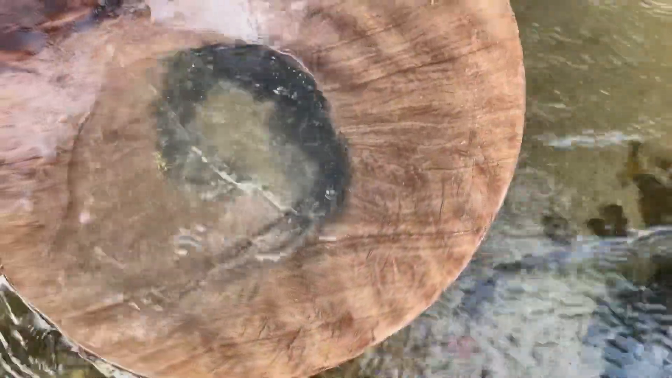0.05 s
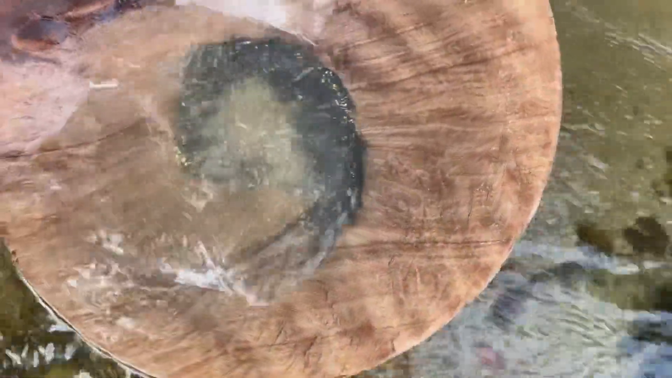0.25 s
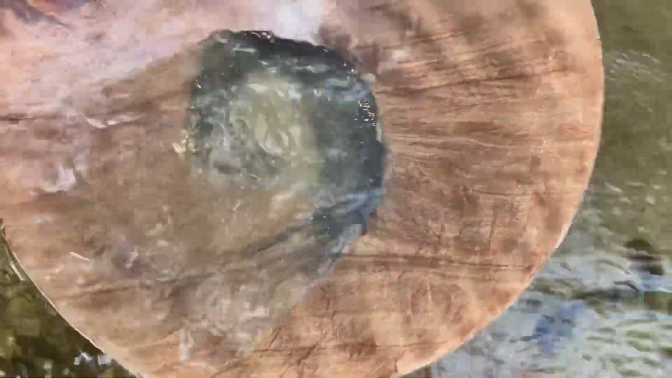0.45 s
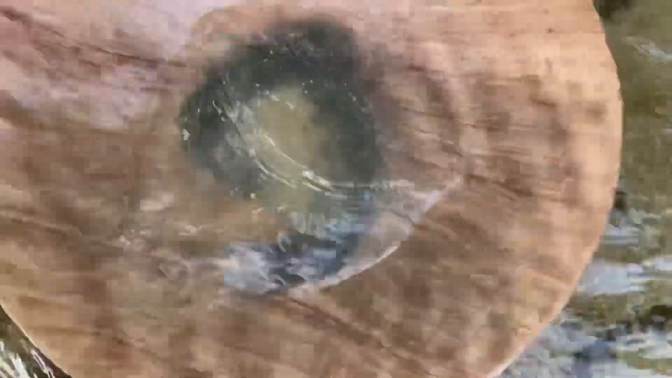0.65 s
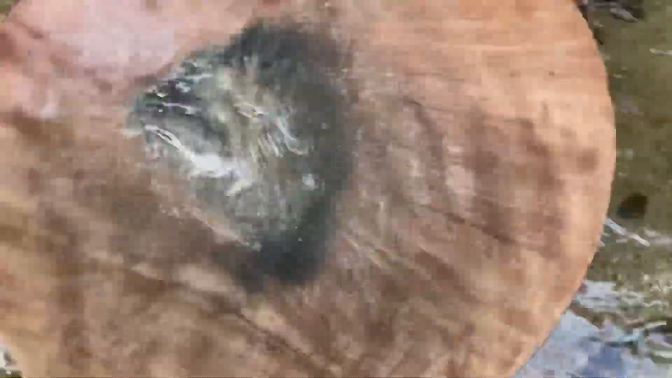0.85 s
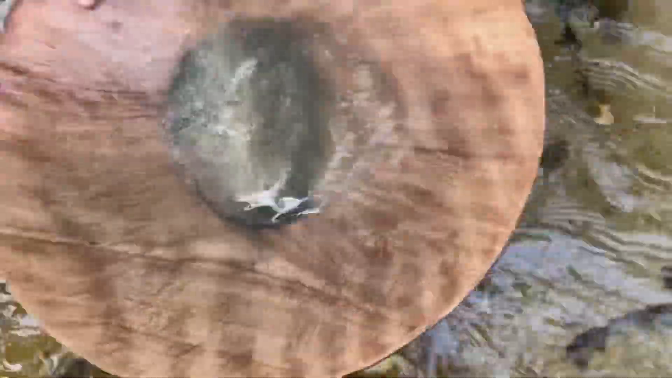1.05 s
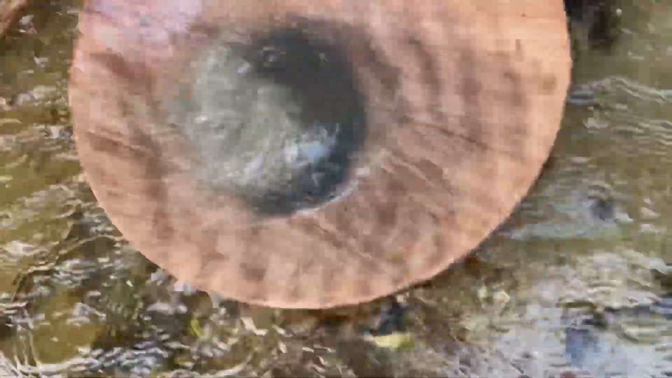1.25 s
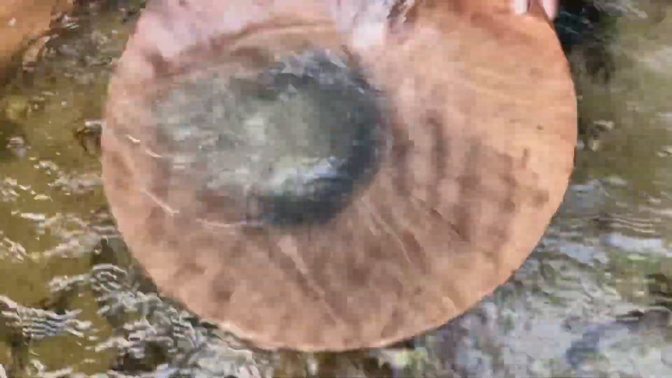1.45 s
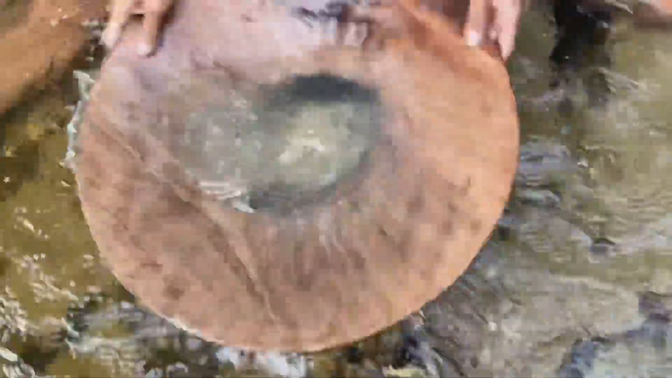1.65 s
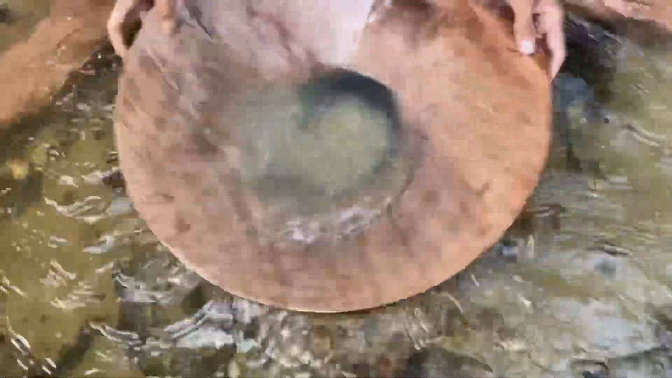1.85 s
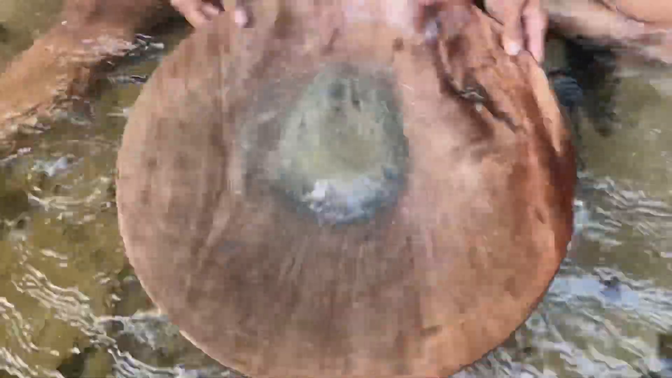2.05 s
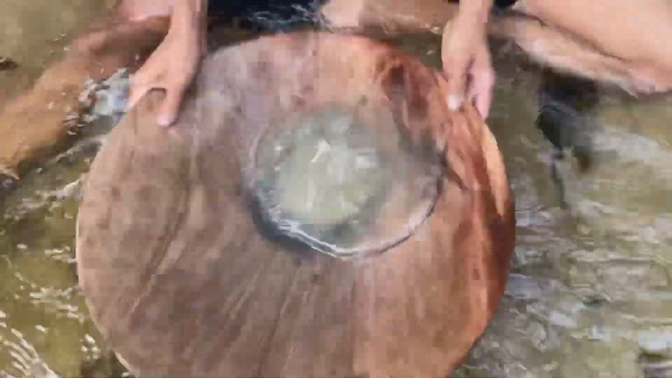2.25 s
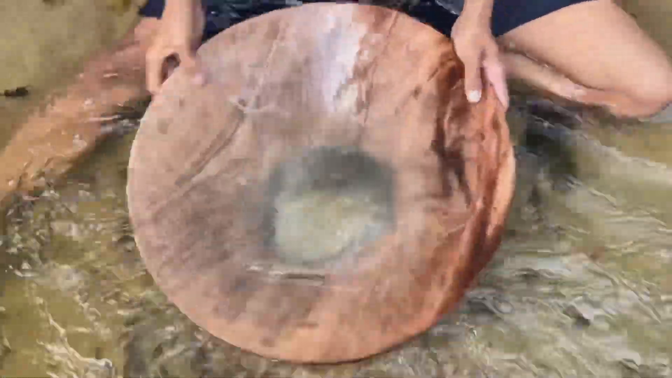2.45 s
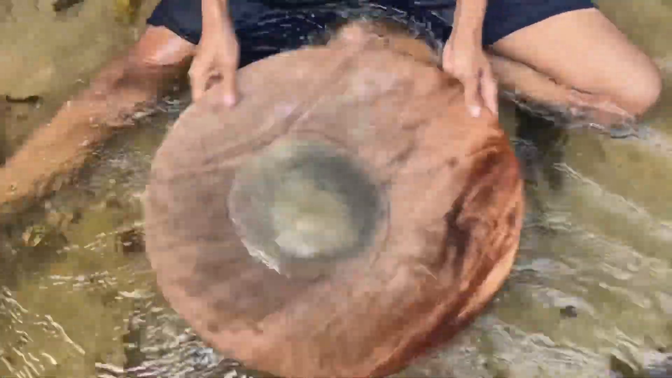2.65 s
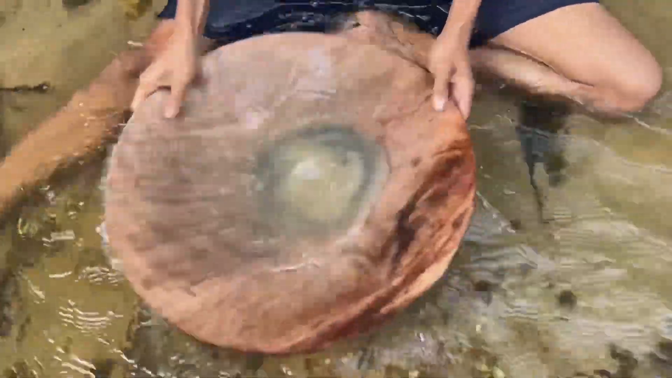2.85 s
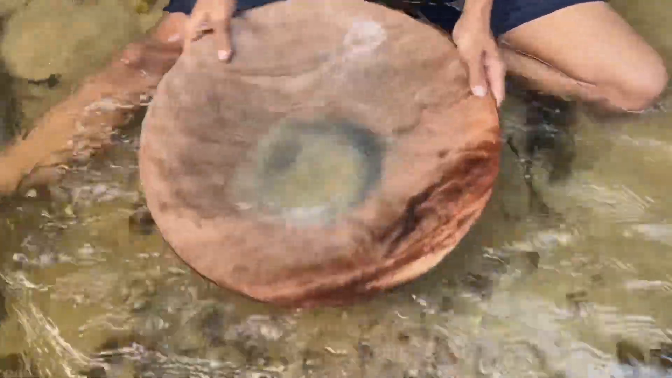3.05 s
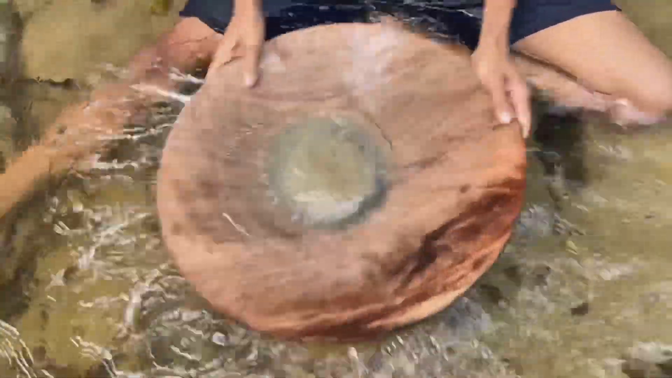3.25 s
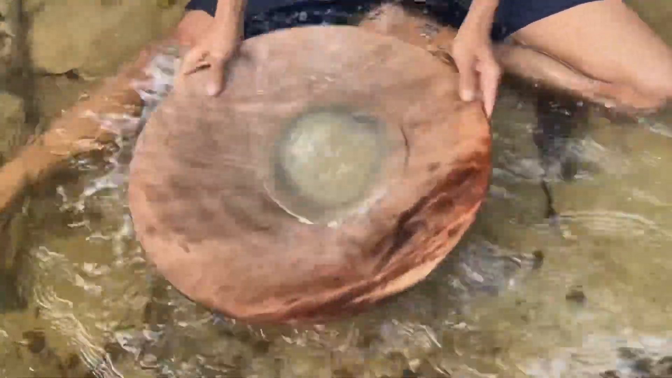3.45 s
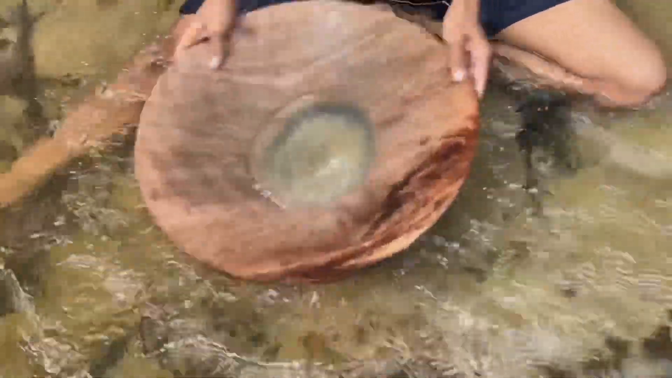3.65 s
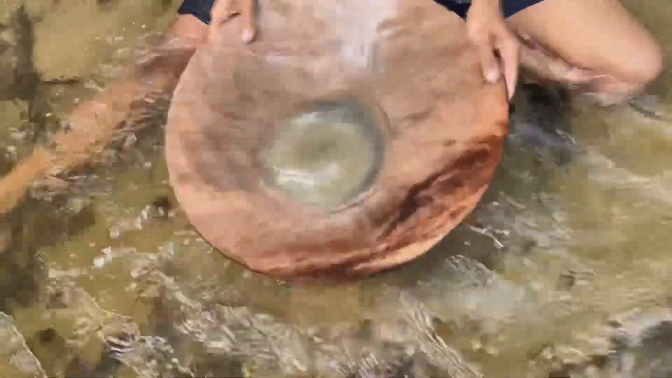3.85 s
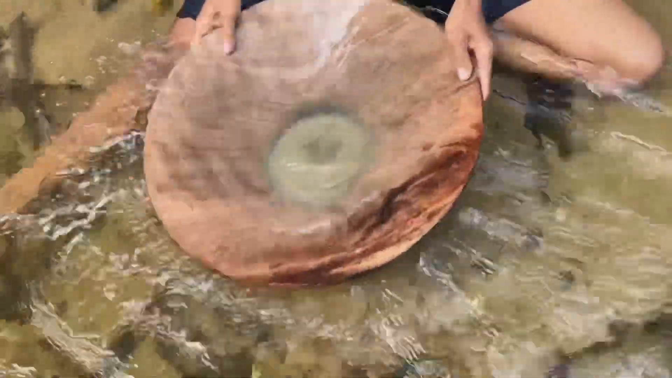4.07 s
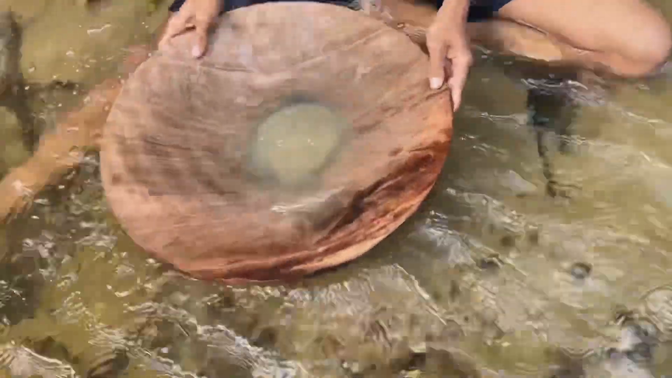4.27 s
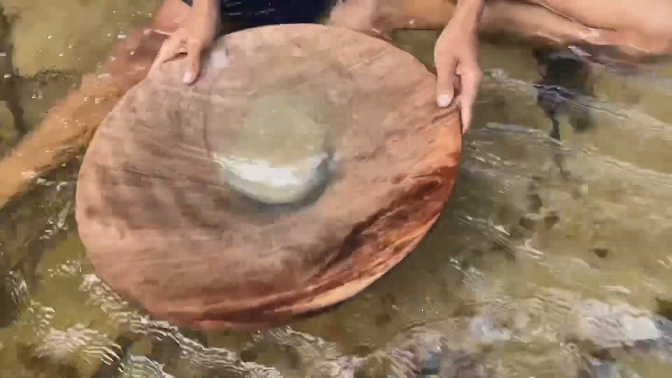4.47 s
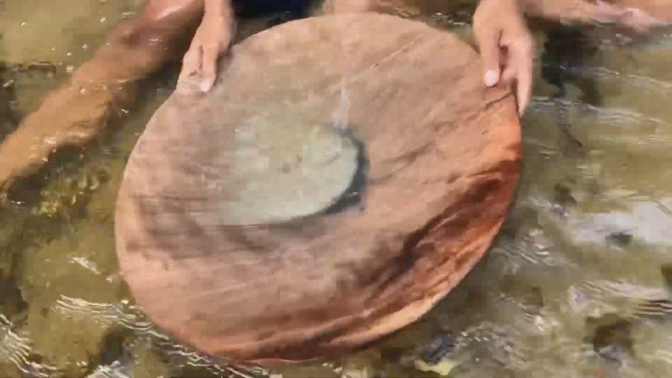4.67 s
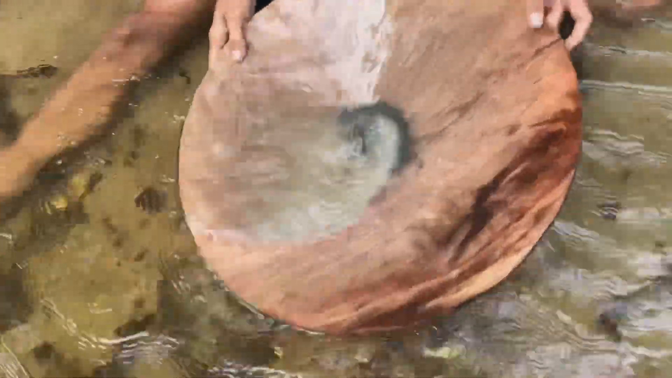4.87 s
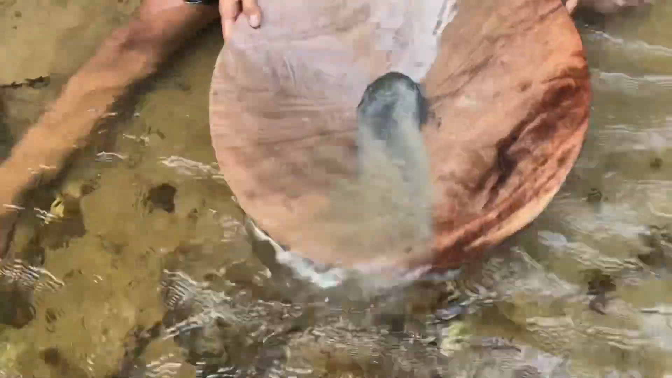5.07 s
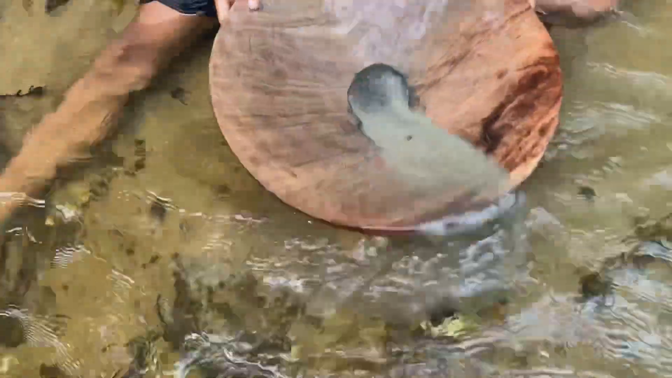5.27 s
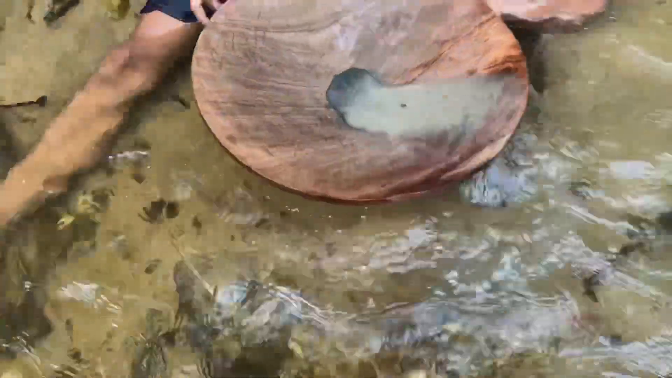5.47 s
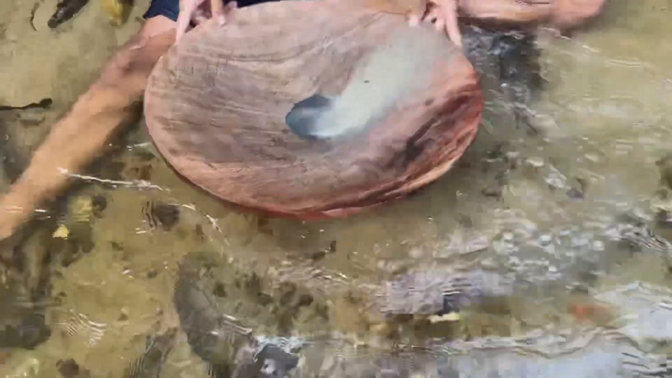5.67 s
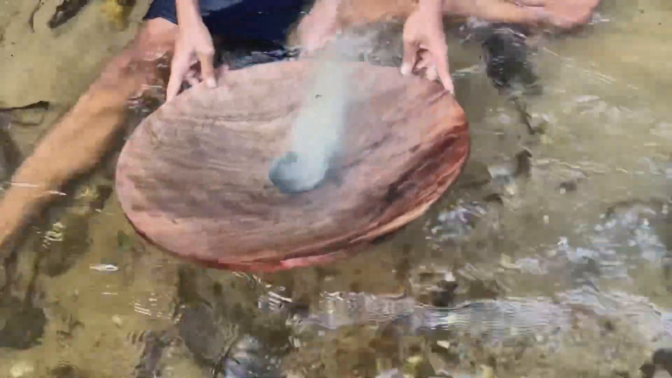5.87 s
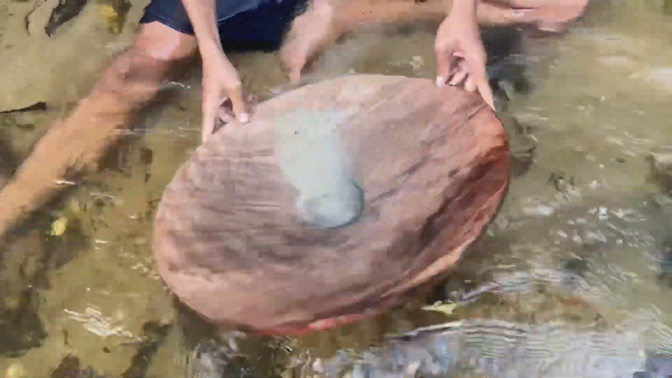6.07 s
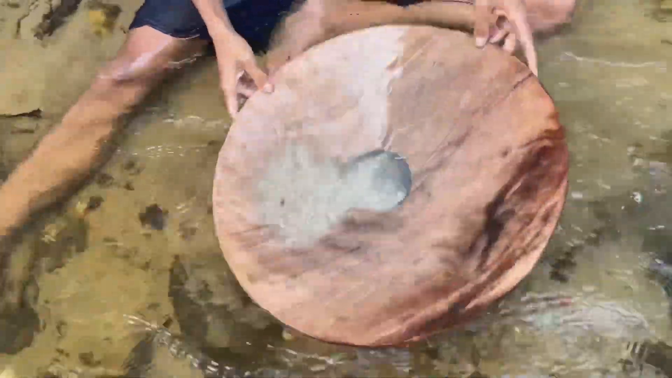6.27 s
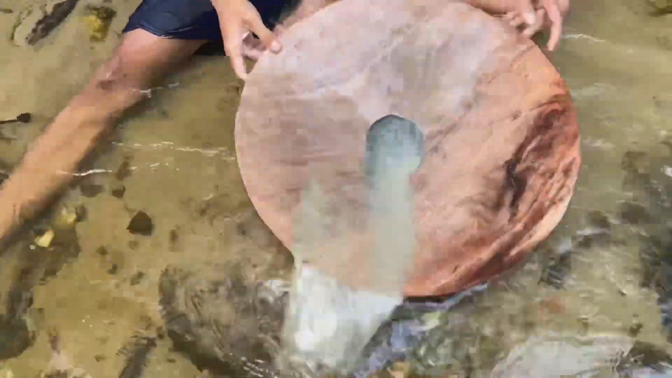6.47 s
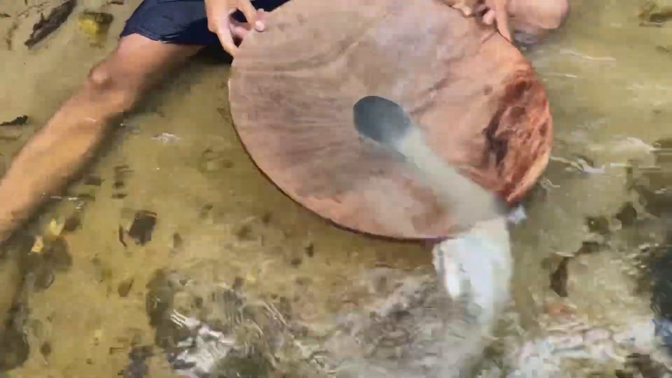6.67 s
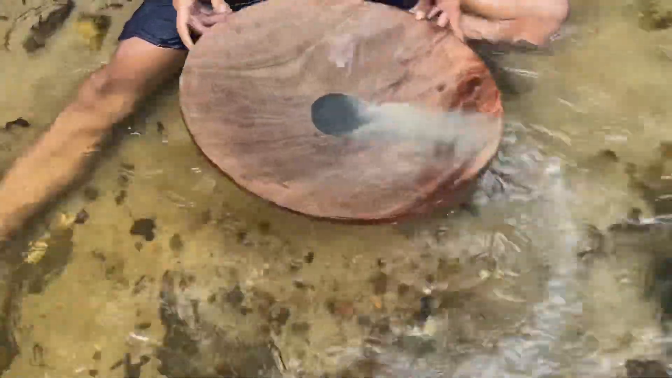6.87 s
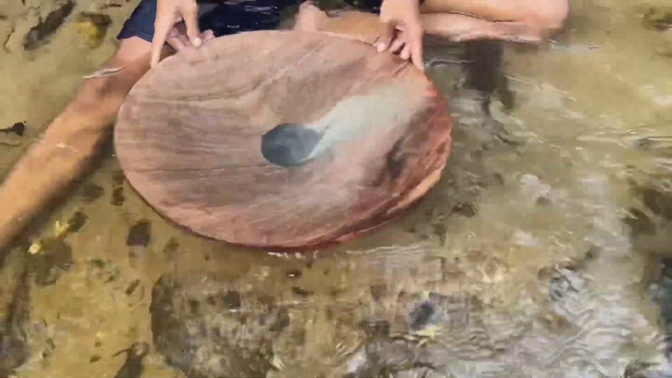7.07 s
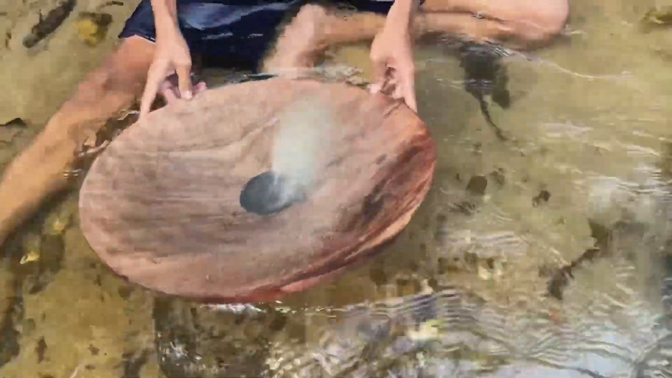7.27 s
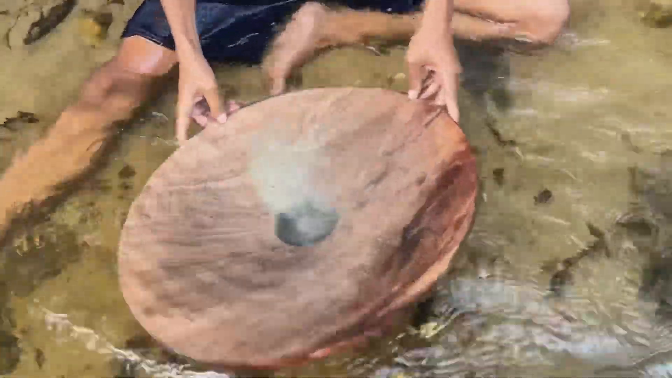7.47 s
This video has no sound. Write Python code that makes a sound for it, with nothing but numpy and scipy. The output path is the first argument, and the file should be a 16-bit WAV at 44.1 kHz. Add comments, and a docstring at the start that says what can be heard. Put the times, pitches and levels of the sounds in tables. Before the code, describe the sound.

A close, natural stereo scene at a shallow forest stream. From 0 to about 4.3 s water is swirled in a wooden pan: irregular bubbly sloshes begin with a sharp slap near 0.55 s and recur every few tenths of a second, with short hollow plops, fizzing spray and dry ticks of gravel on wood. Around 3 to 4 s the swirl is fuller and more gurgling. Birds sing rapidly over it, with arching whistles, downward slurs and raspy buzzes, fainter sweeps behind; a bright note sounds near 3.6 s and a strong trilled one near 4.9 s. From 4.8 s the pan is tipped and the water turns softer, with gulps, drips and a light patter near 5.7 s. Two distant notes slide down around 6 to 6.4 s. A distinct low plop and small pour come at 6.6 s, then quiet drips. A high, shimmering insect drone, stronger left, and faint brook persist to 7.5 s.

```python
"""In a shallow forest stream a wooden gold pan is swirled, then tipped so that water pours off its rim.
Sloshes swell clouds of brief ringing bubbles; air pockets and a few high drops plop as gliding, dying tones,
and gravel ticks on the wood as short noise bursts. Birds whistle and buzz on bent, trilled sine tones,
near and far, over a drone of insects and a trickling brook made of coloured noise and tiny bubbles."""
import sys
import numpy as np
from scipy import signal
from scipy.fft import rfft, irfft
from scipy.io import wavfile
from scipy.ndimage import uniform_filter1d

SR = 44100
rng = np.random.default_rng(int(sys.argv[2]) if len(sys.argv) > 2 else 0)


def unload_audio(sound):
    """Save the sound as a 16-bit wav file, at the path given as the first command line argument."""
    columns = np.transpose(np.atleast_2d(sound))
    # keep every value between -1 and 1, then stretch to whole-number steps
    steps = np.round(np.clip(columns, -1, 1) * 32767)
    wavfile.write(sys.argv[1], SR, steps.astype(np.int16))


N = 331632
TIME = np.arange(N) / SR


def undb(db):
    """Decibels to gain."""
    return 10 ** (np.asarray(db) / 20)


def unit(x):
    """Scale to rms 1."""
    return x / np.sqrt(np.mean(x ** 2))


def curves(table):
    """The columns of a table, joined by straight lines in time."""
    s, *columns = np.transpose(table)
    return [np.interp(TIME, s, column) for column in columns]


def colour(x, points):
    """Minimum-phase filter through (Hz, dB) points, made from the cepstrum of its gain."""
    hz, db = np.transpose(points)
    size = 2048
    f = np.maximum(np.fft.rfftfreq(size, 1 / SR), 1)
    octaves_below = np.maximum(np.log2(hz[0] / f), 0)
    octaves_above = np.maximum(np.log2(f / hz[-1]), 0)
    gain_db = np.interp(np.log(f), np.log(hz), db)
    gain_db = gain_db - 20 * octaves_below - 40 * octaves_above
    cepstrum = irfft(np.log(undb(gain_db)))
    # folding the cepstrum forward makes the filter causal
    cepstrum[1:size // 2] *= 2
    cepstrum[size // 2 + 1:] = 0
    response = irfft(np.exp(rfft(cepstrum)))
    return signal.fftconvolve(x, response[None], axes=1)[:, :N]


def walk(rate):
    """Random levels held 1 / rate s and smoothed twice; spread near 1."""
    k = int(SR / rate)
    steps = np.repeat(rng.standard_normal(N // k + 1), k)
    return 1.54 * uniform_filter1d(uniform_filter1d(steps, k), k)[:N]


def noise(side):
    """Stereo white noise with a given weight of left-right difference."""
    common, apart = rng.standard_normal((2, N))
    return np.array([common + side * apart, common - side * apart])


def pan(db):
    """Left and right gains for a left minus right level in dB."""
    return undb(np.array([[.5], [-.5]]) * db)


def add(out, s, sound):
    """Mix a sound in at a time in seconds."""
    i = int(np.clip(s * SR, 0, N - 1))
    out[:, i:i + sound.shape[-1]] += sound[..., :N - i]


def lagged(x, ms):
    """Delay the left channel against the right; a minus sign lets the left lead."""
    turn = np.exp(-2j * np.pi * np.fft.rfftfreq(N, 1 / SR) * ms / 1000)
    return np.array([irfft(rfft(x[0]) * turn, N), x[1]])


def banks(x, early_s, early_db, late_s, late_db):
    """Water and pan scatter the sound at once; banks and trees return a faint tail."""
    t = np.arange(SR // 2) / SR
    early = rng.standard_normal((2, len(t))) * np.exp(-t / early_s) * np.sqrt(2 / (early_s * SR))
    late = rng.standard_normal((2, len(t))) * np.exp(-t / late_s) * np.sqrt(2 / (late_s * SR))
    echo = undb(early_db) * early + undb(late_db) * late
    return x + signal.fftconvolve(x.mean(axis=0)[None], echo, axes=1)[:, :N]


def bubble(hz, t60, rise, onset=1.0):
    """A pocket of air rings and dies by 60 dB; its pitch glides (octaves) as it nears the surface."""
    t60 = max(t60, .001)
    t = np.arange(int(t60 * SR)) / SR
    cycles = np.cumsum(hz * 2 ** (rise * t / t60)) / SR
    decay = np.exp(-np.log(1000) * t / t60)
    swell = 1 - np.exp(-cycles / onset)  # onset in cycles
    ring = np.sin(2 * np.pi * cycles) * decay * swell
    return ring / np.abs(ring).max()


def bubble_cloud(low_hz, high_hz, cycles, scatter_db, glide, count, onset=0.48):
    """Many bubbles of random size, strength and place; most of them rise in pitch."""
    out = np.zeros((2, N))
    for when, size, life, force, place, bend in rng.random((count, 6)):
        hz = low_hz * (high_hz / low_hz) ** (size ** 0.756)
        strength = undb(-scatter_db * np.log(1 - .96 * force))  # a few stand out
        ring = bubble(hz, cycles * (.5 + life) / hz, glide * (bend - .3), onset)
        add(out, when * N / SR, strength * ring * pan(8 * (2 * place - 1)))
    return unit(out)


# water running round the pan between sloshes: (time_s, level_db before FLOW_TRIM_DB)
FLOW = [(0.0, -60.5), (0.58, -57.5), (0.71, -38), (1.03, -56), (1.44, -51.5), (2.78, -47.5), (3.06, -39),
        (3.26, -43.5), (3.56, -40.5), (3.86, -41.5), (4.06, -42.5), (4.36, -56), (5.23, -53), (6.22, -74.5),
        (6.47, -67.5), (6.64, -45), (6.92, -79), (7.52, -79)]
FLOW_TRIM_DB = -5.5
# waves that build and break on the rim: (crest_s, level_db, build_up_s)
SLOSHES = [(0.544, -33, 0.0057), (0.88, -41, 0.031), (1.111, -39, 0.19), (1.419, -40, 0.15),
           (1.71, -42.5, 0.17), (1.90, -39.5, 0.031), (2.06, -40.5, 0.047), (2.32, -47, 0.24),
           (2.45, -48.5, 0.061), (2.54, -41, 0.066), (2.599, -35.5, 0.0014), (2.822, -38.5, 0.0072),
           (2.955, -43.5, 0.013), (3.24, -39, .001), (3.39, -38.5, 0.051), (3.69, -39, 0.24),
           (3.93, -40, 0.013), (4.758, -52, 0.0094), (5.73, -58.5, 0.22), (5.44, -60.5, 0.059),
           (6.51, -59, 0.0066), (6.89, -62, 0.024), (7.34, -61.5, 0.04)]
DRAIN_S = 0.04  # a broken wave runs back down the pan


def swirl():
    """Level of the water in dB: a running flow, and waves that build, break and drain away."""
    flow_db, = curves(FLOW)
    power = undb(flow_db + FLOW_TRIM_DB) ** 2
    for crest, db, build_s in SLOSHES:
        wave = np.exp(-np.maximum((crest - TIME) / build_s, (TIME - crest) / DRAIN_S))
        power = power + (undb(db) * wave) ** 2
    return 10 * np.log10(power)


# tone of the pan water: (freq_hz, gain_db)
SLOSH_COLOUR = [(60, 9.5), (130, -30), (200, -25), (290, -10), (600, -4), (1300, 4), (1850, 3.5),
                (2250, -0.5), (3500, 5), (5000, 2), (8000, -26)]


def sloshing(slosh_db, fizz_db=-10, gurgle_db=-2.5, wash_db=-8):
    """Water slaps the rim: bursts of brief bubbles, fine fizz and merging gurgles over a faint wash."""
    bubbles = bubble_cloud(220, 2200, cycles=20, scatter_db=2.8, glide=.8, count=4000, onset=2)
    fizz = bubble_cloud(2000, 7000, cycles=36, scatter_db=2, glide=.4, count=2400, onset=4)
    gurgles = bubble_cloud(330, 2400, cycles=45, scatter_db=2.4, glide=1.3, count=1200, onset=6)
    bursts = undb(1.4 * walk(60))
    water = bursts * (bubbles + undb(gurgle_db) * gurgles)
    water = water + undb(fizz_db) * fizz + undb(wash_db) * noise(0)
    return unit(colour(water, SLOSH_COLOUR)) * undb(slosh_db)


# stereo width of the pan water: (freq_hz, side_minus_mid_db)
WATER_WIDTH = [(100, -51), (400, -10), (1000, -8), (1600, -7), (2200, 4.5), (3000, 2.5), (6000, -8)]


def widen(x):
    """Quick reflections off pan and water differ between the ears, most in the upper middle."""
    t = np.arange(SR // 50) / SR
    scatter = rfft(rng.standard_normal(len(t)) * np.exp(-t / .004), 2 * len(t))
    smear = irfft(scatter / np.abs(scatter))[:len(t)]  # phases scrambled, levels evened out
    mid = x.mean(axis=0)
    side = signal.fftconvolve(mid, smear)[:N]
    return mid + np.array([[1], [-1]]) * colour(side[None], WATER_WIDTH)


# tone of the airborne spray: (freq_hz, gain_db)
SPRAY_COLOUR = [(5000, -22.5), (8500, 6), (10000, -14), (13000, 2), (15500, -7)]


def spray(slosh_db):
    """Fine droplets fizz at the top, a little all the time and more with each slosh."""
    fizz = unit(colour(noise(0.028) * undb(3.2 * walk(700)), SPRAY_COLOUR))
    return fizz * (undb(-65.0) + undb(-56.0 + 0.96 * (slosh_db + 44.5)))


def droplets(slosh_db, drop_db=-57):
    """Drops flung off the rim plink on the stream; even a gentle pour sheds some."""
    plinks = bubble_cloud(1500, 5500, cycles=22, scatter_db=6, glide=.3, count=800)
    return plinks * undb(drop_db + 0.51 * (slosh_db + 41.5))


# insect chorus: (time_s, level_db before a 0.5 dB lift, left_minus_right_db)
DRONE = [(0, -46.5, -4), (1.8, -46.5, -4), (2.3, -48.5, -7), (7.5, -49.5, -8)]
# tone of the chorus: (freq_hz, gain_db)
DRONE_COLOUR = [(4800, -13), (5500, -8.5), (5950, 5.5), (6250, 1.5), (6600, 6.5), (7200, 5), (7600, 6),
                (8100, 3), (8600, -3), (9300, -60)]


def insects():
    """A wide, shimmering chorus of banded noise, and one thin, trembling high tone that swells for a while."""
    level_db, pan_db = curves(DRONE)
    voices = rng.standard_normal((2, N)) * undb(0.83 * walk(150))
    chorus = unit(colour(voices, DRONE_COLOUR)) * undb(level_db + 0.5) * pan(pan_db)
    hz = np.interp(TIME, [1, 2.3], [11680, 11830]) + 35 * walk(570)
    swell = np.interp(TIME, [.9, 1.25, 2.1, 2.35], [0.079, 0.56, 0.58, 0.086])
    return chorus + undb(-52.5) * swell * np.sin(2 * np.pi * np.cumsum(hz) / SR)


# tone of the stream: (freq_hz, gain_db)
BROOK_COLOUR = [(40, -12), (100, -13), (180, -7), (350, -9), (800, -2.5), (2200, -1), (3000, -3),
                (5000, -14)]


def brook():
    """The stream trickles on all around: wide noise with faint small bubbles in it."""
    trickle = bubble_cloud(450, 4500, cycles=35, scatter_db=5, glide=.7, count=900)
    return undb(-63) * unit(colour(unit(noise(0.97)) + undb(-18) * trickle, BROOK_COLOUR))


NOTE_ATTACK_S = 0.011  # swell of every note, at most .3 of its length
RASP_PER_S = 1500  # speed of the pitch jitter
TRILL_CHOP_HZ = 746  # trill depth over this gives the loudness pulsing, capped at half


def note(length, start, middle, end, depth, rate, rasp):
    """A whistle on an arc; a fast trill turns it into a buzz, and pitch jitter makes it rasp."""
    u = np.linspace(0, 1, int(length * SR))
    arc = np.polyval(np.polyfit([0, .5, 1], [start, middle, end], 2), u)
    waver, flutter = (np.interp(u, np.linspace(0, 1, len(r)), r) for r in rng.standard_normal((2, 20)))
    jitter = np.interp(u * length * RASP_PER_S, np.arange(400), rng.standard_normal(400))
    beat = 2 * np.pi * np.cumsum(rate * (1 + .3 * waver)) / SR
    trill = depth * (np.sin(beat) + 0.256 * flutter)
    hz = arc + trill + 45 * waver + rasp * jitter
    pulse = 1 - min(abs(depth) / TRILL_CHOP_HZ, .5) * np.cos(beat)
    swell = np.interp(u, [0, min(NOTE_ATTACK_S / length, .3), .7, 1], [0, 1, .9, 0])
    return pulse * swell * undb(2.2 * flutter) * np.sin(2 * np.pi * np.cumsum(hz) / SR)


QUIVER_HZ, QUIVER_PER_S = 65.5, 350  # slight tremor of all whistles
WHISTLE_RASP_HZ = 28  # spread of the pitch jitter in the clean notes


def whistle(length, start, middle, end):
    """A clean note: only a slight, fast quiver and little rasp."""
    return note(length, start, middle, end, QUIVER_HZ, QUIVER_PER_S, WHISTLE_RASP_HZ)


# whistles that arch over or climb: (start_s, length_s, start_hz, middle_hz, end_hz, level_db, fade_db)
ARCHES = [(0.025, 0.076, 3230, 4500, 4900, -29, -3), (0.083, 0.085, 4930, 4750, 4300, -34, 6),
          (0.797, 0.062, 4220, 5000, 4700, -36, -0.5), (2.315, 0.042, 4150, 4600, 4300, -47, -5),
          (2.334, 0.038, 3280, 3490, 3500, -39.5, 0), (2.367, 0.03, 3350, 3350, 2720, -37.5, 2),
          (2.455, 0.049, 4050, 4420, 3650, -37.5, -1), (2.647, 0.046, 3620, 4340, 3800, -36.5, 3),
          (2.687, 0.04, 4040, 4200, 4730, -37.5, 9), (3.614, 0.11, 3350, 5110, 4710, -32, 0),
          (4.086, 0.057, 3520, 4390, 5000, -42, -15)]


def arched_whistles():
    """Whistles bend through a middle pitch; each fades, or with a minus fade grows, along its length."""
    song = []
    for s, length, start, middle, end, db, fade_db in ARCHES:
        tone = whistle(length, start, middle, end)
        song.append((s, tone * undb(db - np.linspace(0, fade_db, len(tone)))))
    return song


# gravel on wood: (start_s, level_db before the tick trim and tone)
TICKS = [(0.106, -31), (0.278, -21.5), (0.568, -27), (0.958, -25.5), (1.002, -20), (1.082, -21.5),
         (1.1168, -23), (1.6638, -26), (1.881, -24), (2.013, -23.5), (2.3707, -26.5), (2.603, -19.5),
         (2.9578, -27), (3.241, -27), (4.059, -30), (4.209, -32), (5.1425, -27), (5.31, -34.5),
         (5.851, -26), (6.494, -34), (6.521, -29.5)]
# tone of stone on wood: (freq_hz, gain_db)
TICK_COLOUR = [(800, -10), (2000, -2), (4000, 1), (7000, -1), (10000, -6), (15000, -9)]


def gravel(tick_db=4):
    """Small stones skid briefly on the wood: noise with a sharp start and a fast decay."""
    out = np.zeros((2, N))
    t = np.arange(SR // 40) / SR
    for s, db in TICKS:
        skid = rng.standard_normal(len(t)) * np.exp(-t / .002) * (1 - np.exp(-t / .0003))
        add(out, s, undb(db + tick_db) * skid / np.abs(skid).max())
    return colour(out, TICK_COLOUR)


# sweeps from further off, slow at first and then faster: (start_s, length_s, start_hz, end_hz)
FAR_SWEEPS = [(0.137, 0.072, 3160, 4230), (0.457, 0.07, 3080, 4700), (1.729, 0.078, 6420, 5080),
              (1.943, 0.067, 6200, 4800), (2.139, 0.1, 4160, 5300), (2.42, 0.06, 3610, 4000),
              (2.632, 0.072, 3070, 3700), (2.835, 0.097, 3170, 3530), (3.022, 0.1, 3530, 2690)]
FAR_SWEEP_DB = -48
FAR_BEND = .3  # share of the sweep done by mid-note


def far_sweeps():
    """Thin whistles that start sliding slowly and then speed up."""
    out = np.zeros((2, N))
    for s, length, start, end in FAR_SWEEPS:
        middle = start + FAR_BEND * (end - start)
        add(out, s, undb(FAR_SWEEP_DB) * whistle(length, start, middle, end))
    return out


# buzzes: (start_s, length_s, start_hz, end_hz, level_db,
#          trill_depth_hz with minus for rising loud strokes, trills_per_s, rasp_hz)
BUZZES = [(0.264, 0.0346, 3200, 3530, -33.5, 290, 350, 220),
          (0.549, 0.07, 4070, 3320, -38.5, 501, 117, 300), (0.611, 0.066, 3130, 3200, -36, 132, 270, 111),
          (0.714, 0.12, 3640, 3960, -38.5, 397, 91, 250), (1.461, 0.033, 4070, 5070, -39.5, -750, 85, 100),
          (1.742, 0.013, 3480, 3700, -34.5, 400, 69, 100), (1.762, 0.015, 3160, 3070, -38, 498, 50, 200),
          (1.783, 0.05, 3260, 2860, -34, 148, 61, 60), (1.909, 0.03, 3830, 3510, -39.5, 606, 143, 300),
          (2.087, 0.13, 2600, 3390, -41.5, 398, 70, 200), (2.558, 0.029, 3260, 2700, -40, 350, 93, 350),
          (3.009, 0.08, 7000, 5920, -40.5, 403, 88, 300), (3.131, 0.025, 6300, 5400, -34.5, 500, 200, 200),
          (3.324, 0.085, 3580, 4130, -43.5, 496, 63, 302), (3.441, 0.077, 3260, 2700, -43.5, 200, 116, 220),
          (4.204, 0.048, 2740, 2330, -43, 294, 65, 330), (4.281, 0.05, 2370, 2980, -43, 366, 120, 280),
          (4.355, 0.027, 4230, 3330, -41.5, 450, 105, 200), (4.401, 0.066, 3700, 2340, -39, 400, 79, 140),
          (4.55, 0.094, 4880, 5050, -38.5, -780, 165, 380),
          (4.694, 0.062, 3300, 3370, -36.5, 205, 1100, 168),
          (4.735, 0.083, 3130, 2880, -42.5, 220, 53, 320), (4.856, 0.031, 3000, 3980, -36.5, 300, 340, 101),
          (4.867, 0.063, 3960, 3900, -27.5, 220, 236, 50)]


def buzzes():
    """Notes on a straight slide, trilled so fast and rough that they buzz."""
    song = []
    for s, length, start, end, db, depth, rate, rasp in BUZZES:
        middle = (start + end) / 2
        song.append((s, undb(db) * note(length, start, middle, end, depth, rate, rasp)))
    return song


# whistles that slide fast and level out: (start_s, length_s, start_hz, end_hz, level_db)
SLURS = [(0.407, 0.065, 3110, 2540, -42.5), (1.364, 0.055, 6870, 3720, -35.5),
         (1.722, 0.026, 3980, 3430, -32.5), (2.276, 0.0062, 5200, 6600, -32),
         (2.504, 0.024, 6450, 5560, -37), (2.75, 0.0059, 6260, 5740, -30.5),
         (2.753, 0.0307, 4900, 3890, -39), (2.804, 0.039, 5400, 3900, -35.5),
         (2.881, 0.039, 4590, 3330, -37.5), (3.942, 0.093, 6570, 4450, -37.5)]
SLUR_BEND = .87  # share of the slide done by mid-note


def slurs():
    """Whistles that do most of their slide in the first half."""
    song = []
    for s, length, start, end, db in SLURS:
        middle = start + SLUR_BEND * (end - start)
        song.append((s, undb(db) * whistle(length, start, middle, end)))
    return song


def rumble_cut(x):
    """Keep the ringing plops and gulps clear of the lows."""
    return signal.sosfilt(signal.butter(4, 200, "highpass", fs=SR, output="sos"), x)


# large bubbles that ring on: (start_s, peak_db, pitch_hz, pitch_rise_octaves over the ring, ring_s)
GULPS = [(0.549, -37, 336, 0.39, 0.12), (0.876, -35, 350, 0.097, 0.033), (1.17, -31.5, 515, 0.12, 0.083),
         (1.214, -41, 289, 0.8, 0.12), (2.945, -30.5, 305, 0.34, 0.035), (3.43, -36, 634, -0.65, 0.12),
         (3.463, -41, 304.7, 0, 0.53), (3.522, -38, 290, -1.54, 0.45), (3.571, -31, 329, -0.33, 0.089),
         (3.649, -38.5, 286.3, 1.6, 0.41), (3.777, -35, 435, 1.5, 0.2), (3.828, -37.5, 254, -0.3, 0.24),
         (3.964, -30.5, 424, 1.1, 0.048), (4.887, -37, 760, 0.02, .06), (4.926, -43, 885, -0.71, 0.086),
         (5.003, -42, 592, -0.1, 0.11), (5.069, -42.5, 862, 0.68, 0.064), (5.214, -38.5, 388, -0.31, 0.26),
         (5.26, -45, 925, -0.0088, 0.12), (5.434, -39.5, 488, 2.4, 0.17), (5.966, -42, 810, -0.073, 0.075),
         (6.493, -43.5, 655, -0.097, 0.088), (6.521, -43.5, 1230, -1.3, 0.09),
         (6.58, -25.5, 539, -0.32, 0.13), (6.672, -41, 700, -0.46, 0.15)]


def gulps():
    """Large air pockets ring on and glide up or down as they die."""
    rings = np.zeros((2, N))
    for s, db, hz, glide, ring_s in GULPS:
        add(rings, s, undb(db) * bubble(hz, ring_s, glide, onset=0.51))
    return rumble_cut(rings)


# short plops of trapped air, and a few high, ringing drops in the pour: (start_s, peak_db, pitch_hz, ring_s)
PLOPS = [(0.555, -28, 1310, 0.034), (0.564, -26, 1650, 0.034), (0.574, -29, 1310, .03),
         (0.595, -32, 1045, 0.038), (0.658, -24.5, 890, 0.0052), (0.682, -38, 795, 0.022),
         (0.69, -32.5, 1260, 0.033), (0.721, -35, 1280, .035), (0.782, -26.5, 950, 0.014),
         (0.866, -33.5, 575, 0.028), (1.047, -22, 1090, 0.014), (1.087, -32, 1080, 0.035),
         (1.123, -36, 770, 0.038), (1.278, -35, 1240, 0.031), (1.579, -34.5, 1295, 0.027),
         (1.782, -40, 775, 0.032), (1.846, -29.5, 1290, 0.029), (1.879, -28.5, 796, 0.014),
         (1.929, -28.5, 1660, 0.021), (1.967, -31, 1880, 0.015), (2.035, -32.5, 1255, 0.033),
         (2.079, -35.5, 1120, 0.046), (2.193, -25.5, 843, 0.018), (2.534, -31.5, 1710, 0.033),
         (2.601, -38, 1150, 0.012), (2.637, -30, 1220, 0.016), (2.665, -30.5, 1100, 0.055),
         (2.822, -23, 1574, .022), (2.824, -29.5, 630, 0.018), (2.837, -26, 1650, 0.026),
         (2.867, -31, 1250, .025), (2.985, -29.5, 622, 0.036), (3.018, -35, 1850, 0.024),
         (3.076, -33.5, 1420, 0.017), (3.103, -37, 1570, 0.023), (3.122, -34, 1670, .02),
         (3.238, -33, 1420, .012), (3.285, -22.5, 1290, 0.024), (3.396, -32, 1710, 0.038),
         (3.602, -29, 1650, 0.028), (3.785, -27.5, 1200, 0.019), (3.795, -25, 1247, 0.051),
         (3.916, -29, 825, 0.06), (3.988, -30, 1620, 0.011), (4.109, -29.5, 750, 0.01),
         (4.58, -32.5, 850, 0.042), (4.595, -34.5, 1326, 0.033), (4.957, -38.5, 1800, .025),
         (5.142, -39, 2240, 0.043), (5.549, -38.5, 2120, 0.026), (5.725, -38.5, 2230, 0.047),
         (5.773, -41.5, 1470, 0.02), (6.549, -42, 4070, .015), (6.625, -30.5, 874, 0.023),
         (6.667, -35, 1390, 0.024), (6.693, -50, 4280, 0.064), (6.712, -46, 2150, .02),
         (6.75, -45, 970, 0.04), (6.8, -42.5, 845, 0.026), (7.103, -42.5, 1590, 0.022)]


def plops(rise=0.11, slap_share=0.32, splat_db=-9):
    """Trapped air or a drop rings at its own pitch; a splat of noise joins it, shorter when the ring is short."""
    rings, splats = np.zeros((2, 2, N))
    t = np.arange(SR // 20) / SR
    for s, db, hz, ring_s in PLOPS:
        onset_s = s + .002
        add(rings, onset_s, undb(db) * bubble(hz, ring_s, rise, onset=.7))
        slap = np.exp(-t / (slap_share * ring_s)) + np.exp(-t / 0.001)
        add(splats, onset_s, undb(db + splat_db) * rng.standard_normal(len(t)) * slap)
    splat_colour = [(70, 3.5), (180, -8.5), (350, -6.0), (1700, 4.0), (2300, -4.5), (6000, -2.5)]
    return rumble_cut(rings) + colour(splats, splat_colour)


# open pockets that glide: (start_s, length_s, start_hz, end_hz, level_db)
GURGLES = [(1.301, 0.013, 774, 1100, -35.5), (3.338, .036, 600, 1080, -40.5),
           (3.381, 0.035, 758, 1340, -35), (3.52, 0.023, 940, 1370, -38), (3.694, 0.042, 773, 1100, -36.5),
           (5.39, 0.04, 790, 1513, -48.5), (6.547, 0.052, 1130, 890, -47)]


def gurgling():
    """An open air pocket swells into voice and glides as the water closes or widens it."""
    out = np.zeros((2, N))
    for s, length, start, end, db in GURGLES:
        u = np.linspace(0, 1, int(length * SR))
        hz = start * (end / start) ** (u ** 1.37)
        add(out, s, undb(db) * np.sin(np.pi * u) * np.sin(2 * np.pi * np.cumsum(hz) / SR))
    return out


POUR_S = 4.76  # the pan is tipped
DRIBBLE_DB, DRIBBLE_FOLLOW = -59, 0.41  # drip level at -57 dB of water; dB more per dB of water


def dribble(slosh_db):
    """Once the pan is tipped, drops fall from its rim and ring in the stream, louder with each wave."""
    drops = bubble_cloud(560, 3000, cycles=50, scatter_db=2.6, glide=0.7, count=520, onset=2.5)
    tipped = np.clip((TIME - POUR_S) / 0.21, 0, 1)
    return drops * tipped * undb(DRIBBLE_DB + DRIBBLE_FOLLOW * (slosh_db + 57.0))


# showers off the rim: (middle_s, spread_s, level_db)
SHOWERS = [(5.74, 0.04, -50), (6.61, 0.08, -58)]


def showers():
    """Where the poured sheet of water breaks up, it patters on the stream as a dense shower of fine drops."""
    patter = bubble_cloud(1500, 5500, cycles=20, scatter_db=4, glide=.5, count=2400)
    level = np.zeros(N)
    for s, spread, db in SHOWERS:
        level += undb(db) * np.exp(-.5 * ((TIME - s) / spread) ** 2)
    return patter * level


# two long distant notes, one curve each: (time_s, pitch_hz, level_db)
FAR_SLIDES = [
    [(5.93, 3990, -70), (6.02, 3970, -58.5), (6.12, 3850, -58), (6.25, 3670, -61), (6.34, 3500, -72)],
    [(6.07, 3850, -55), (6.16, 3540, -55), (6.25, 3450, -57), (6.42, 3480, -64), (6.48, 3470, -65)],
]


def far_slides():
    """Two long, slightly unsteady notes slide down over each other, stronger on the right."""
    out = np.zeros((2, N))
    for slide in FAR_SLIDES:
        hz, db = curves(slide)
        sounding = (TIME > slide[0][0]) & (TIME < slide[-1][0])
        tone = np.sin(2 * np.pi * np.cumsum(hz + 14 * walk(200)) / SR)
        out = out + sounding * undb(db) * tone * pan(-5.5)
    return out


def birds():
    """Birds sing a quick run of arched whistles, slurs and buzzes, some notes overlapping."""
    out = np.zeros((2, N))
    for s, sound in arched_whistles() + slurs() + buzzes():
        add(out, s, sound * pan(-1 + rng.standard_normal()))
    return lagged(out, -0.021)


def far_birds():
    """Further off, thin sweeps and long sliding notes are blurred by the trees."""
    return banks(far_sweeps() + far_slides(), early_s=.02, early_db=-4, late_s=.08, late_db=-6)


def scene():
    """Pan and birds in front, stream and insects around; spray and gravel reach the right ear first."""
    slosh_db = swirl()
    pan_water = widen(sloshing(slosh_db) + gulps() + plops() + gurgling() + dribble(slosh_db))
    water = banks(pan_water, early_s=.01, early_db=-16, late_s=.1, late_db=-25)
    bright = lagged(spray(slosh_db) + gravel(), .33)
    song = banks(birds(), early_s=.012, early_db=-9, late_s=.1, late_db=-19)
    return water + droplets(slosh_db) + showers() + bright + song + far_birds() + insects() + brook()


TOP_HZ = 15800


def record(dry):
    """A small steady offset drops away with a soft thud; everything above TOP_HZ is cut steeply."""
    offset = undb(-44.0) * np.interp(TIME, [5.456, 5.462], [1, 0])
    return signal.sosfilt(signal.ellip(8, .2, 70, TOP_HZ, fs=SR, output="sos"), dry + offset)


dry = scene()
out = record(dry)
unload_audio(out)
```